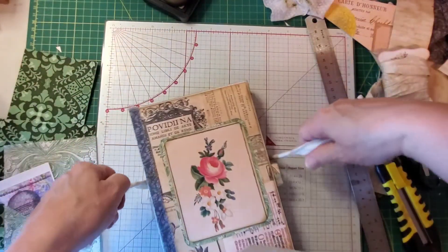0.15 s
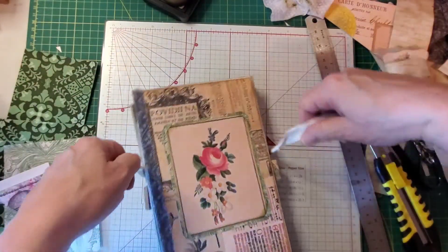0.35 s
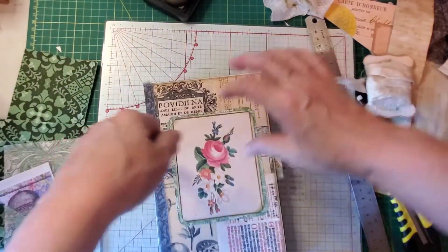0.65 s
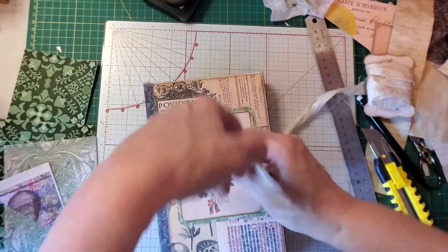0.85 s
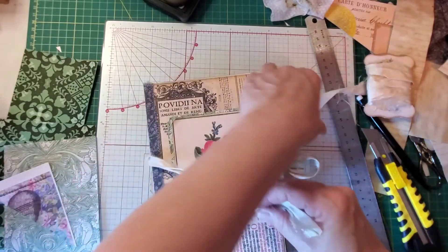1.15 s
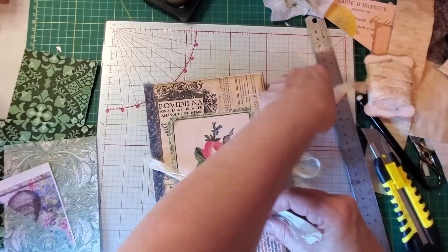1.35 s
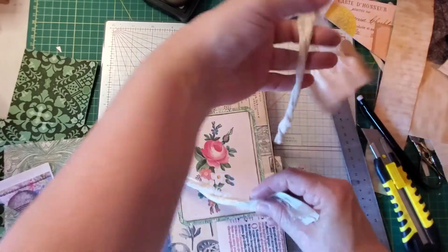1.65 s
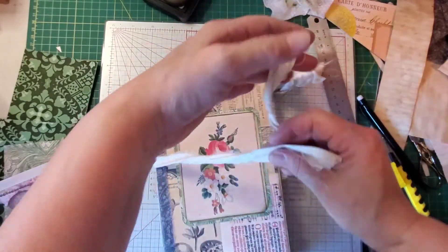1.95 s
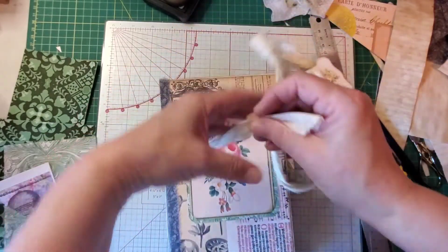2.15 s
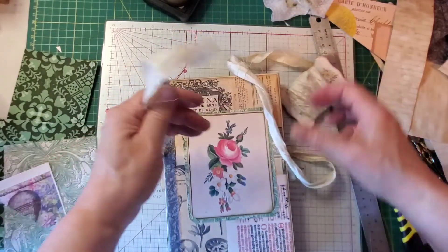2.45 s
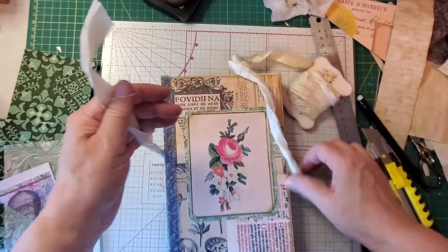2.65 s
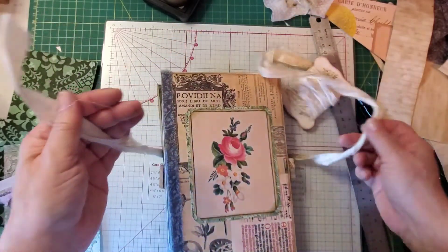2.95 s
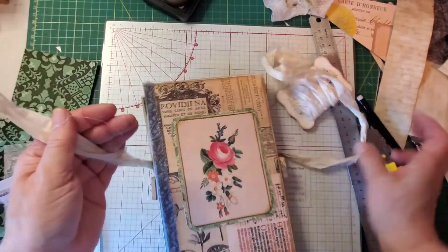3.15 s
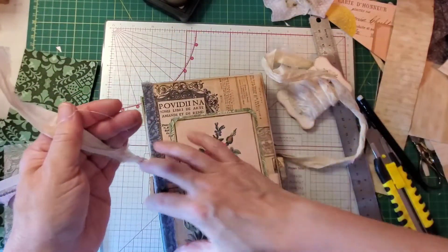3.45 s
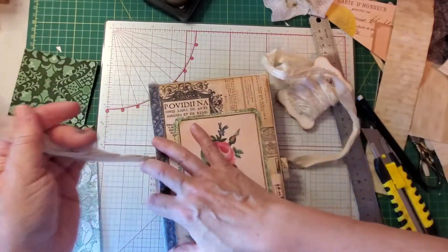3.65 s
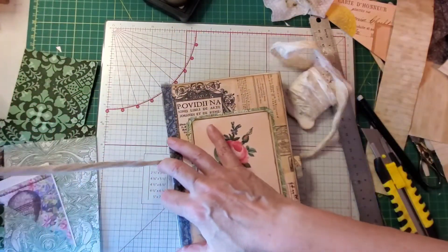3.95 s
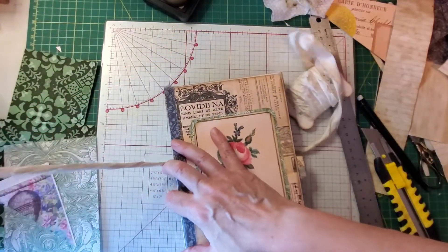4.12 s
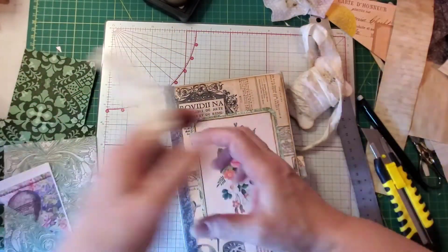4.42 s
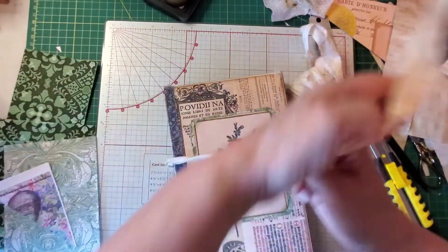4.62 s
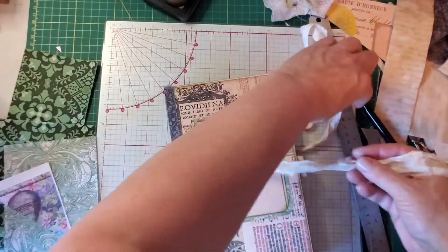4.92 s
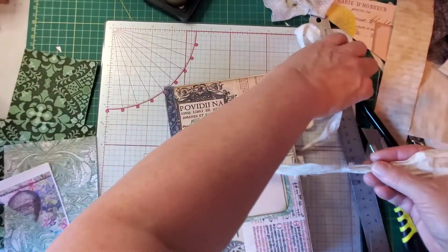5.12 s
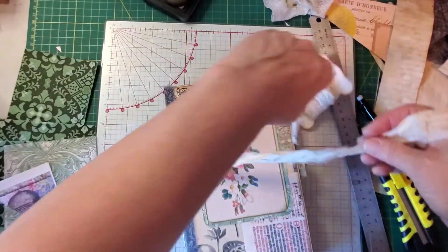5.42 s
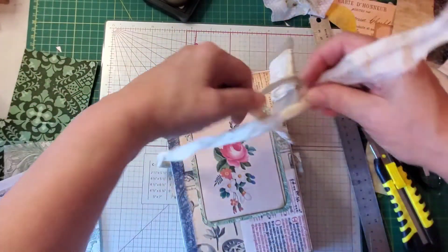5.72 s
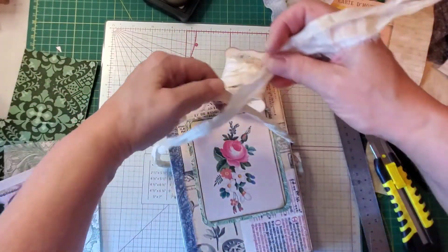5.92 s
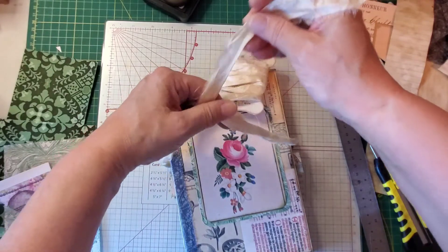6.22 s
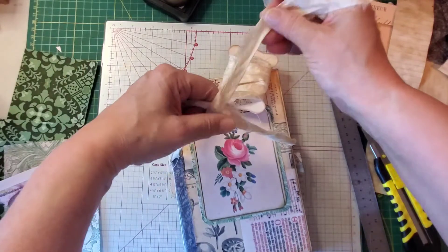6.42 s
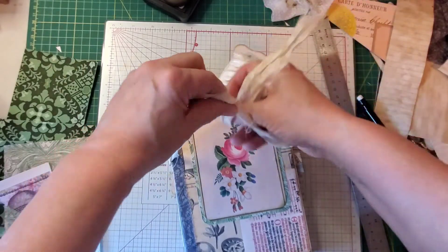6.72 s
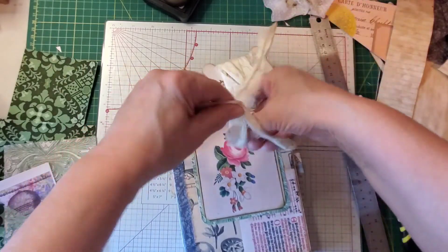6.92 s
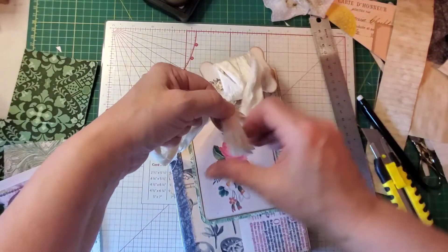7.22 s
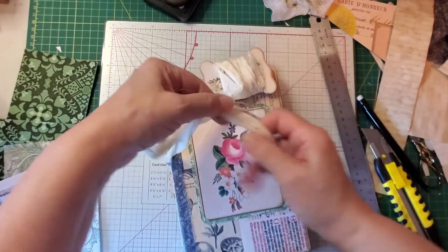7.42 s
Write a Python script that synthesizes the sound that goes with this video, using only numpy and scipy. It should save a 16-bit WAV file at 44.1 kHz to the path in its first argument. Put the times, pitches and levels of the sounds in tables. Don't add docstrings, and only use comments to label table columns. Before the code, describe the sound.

Handling sounds on a craft table, recorded close with a little room echo and a low faint hush. A book slide opens with a dull thump; card catches and drags in bursts, the second far the loudest. A soft ribbon is pulled rasping along the book, the card skids again lying flat, and the ending is nearly silent, with delicate silk rustle and light taps.

```python
import sys
import numpy as np
from scipy import signal
from scipy.fft import rfft, irfft, next_fast_len
from scipy.io import wavfile
from scipy.ndimage import uniform_filter1d, map_coordinates

SR = 44100
rng = np.random.default_rng(int(sys.argv[2]) if len(sys.argv) > 2 else 0)


def transcribe(u):
    v = np.clip(np.atleast_2d(u).T, -1, 1)
    q = np.round(v * 32767).astype(np.int16)
    wavfile.write(sys.argv[1], SR, q)


def undo_db(level):
    steps = np.asarray(level, float) / 20
    return 10 ** steps


N = 333837
T, HZ = np.arange(N) / SR, np.fft.rfftfreq(8192, 1 / SR)
REST_DB = -95
# f/Hz, level/dB
FAR_SIDE = [(25, -9.5), (60, -15.5), (180, -12.5), (550, 1), (1650, 3.5), (4970, 1), (15000, -9)]


def unit_rms(x):
    return x / np.sqrt(np.mean(x ** 2) + 1e-20)


def read(points, hz=HZ):
    f, value = np.transpose(points)
    return np.interp(np.log(hz + 1), np.log(f + 1), value)


def colour(x, gain, size=4096):
    log_gain = np.log(np.maximum(gain, gain.max() * 1e-5))
    circle = signal.hilbert(np.r_[log_gain, log_gain[-2:0:-1]])
    impulse = np.fft.ifft(np.exp(circle.conj())).real[None, :size]
    return signal.oaconvolve(x, impulse, axes=1)[:, :x.shape[1]]


def drift(top_hz):
    t = T[::64]
    speeds_hz = top_hz * np.geomspace(.04, 1, 12)
    slow = sum(np.sin(2 * np.pi * (f * t + rng.random())) / np.sqrt(f) for f in speeds_hz)
    return np.interp(T, t, unit_rms(slow))


def strokes(rows, sag_db_s, stop_s):
    s, rise, glide, db = np.transpose(rows)[:4, :, None]
    t = T[::64]
    start = np.clip(1 + (t - s) / rise, 1e-12, 1)
    end_db = db - sag_db_s * glide
    sag_db = sag_db_s * np.clip(t - s, 0, glide)
    stop_db = abs(end_db - REST_DB) * np.maximum(t - s - glide, 0) / stop_s
    return np.interp(T, t, (db + 20 * np.log10(start) - (sag_db + stop_db)).max(0))


def leaning(level_db, middling_db, slope):
    return middling_db + slope * (np.clip(level_db, REST_DB, 0) + 45)


def along(rows, column):
    rows = np.array(rows)
    return np.interp(T, rows[:, 0] + .004, rows[:, column])


def spikes(rows, db, t60, rise=0.0011):
    train, t = np.zeros(N), T[:8000]
    np.add.at(train, (np.array(rows)[:, 0] * SR).astype(int), undo_db(db))
    return signal.oaconvolve(train, (1 - np.exp(-t / rise)) * undo_db(-60 * t / t60))[:N]


def slips(per_s, spread_db, t60, smooth):
    size = undo_db(spread_db * np.minimum(rng.exponential(1, N), 4))
    releases = size * (rng.random(N) < per_s / SR)
    grain = signal.oaconvolve(releases, undo_db(-60 * T[:2000] / t60))[:N]
    return unit_rms(smooth + unit_rms(grain))


def pair(pressure, side, lag_share=.7):
    size = next_fast_len(len(pressure))
    hz = np.fft.rfftfreq(size, 1 / SR)
    mid, other = pressure * rng.standard_normal((2, len(pressure)))
    share = lag_share * np.tanh(3 * np.cos(np.sqrt(hz / 40)))
    mixed = 1j * share * rfft(mid, size) + np.sqrt(1 - share ** 2) * rfft(other, size)
    other = irfft(mixed * undo_db(read(side, hz)), size)[:len(pressure)]
    return np.array([mid + other, mid - other])


def rub(pressure, bright_db, hollow_db, pan_db, body, rings=(), lean_db=None, low_hz=1400):
    # f/Hz, level/dB
    near_side = [(60, -2), (150, -16.5), (380, -21.5), (950, -5), (2380, -2.5), (5980, -0.5), (15000, 2)]
    resonance = sum(undo_db(2 * db) / (1 + (2 * (HZ - hz) / width) ** 2) for hz, width, db in rings)
    gain = undo_db(read(body)) * np.sqrt(1 + resonance)
    low = 1 / np.sqrt(1 + (HZ / low_hz) ** 12)
    high = 1 / np.sqrt(1 + (7200 / (HZ + 1)) ** 16)
    middle = unit_rms(np.sqrt((1 - low ** 2) * (1 - high ** 2)) * gain)
    parts = [(unit_rms(low * gain), hollow_db), (unit_rms(high * gain), bright_db)]
    if lean_db is None:
        parts.append((middle, 0))
    else:
        under = 1 / np.sqrt(1 + (HZ / 3050) ** 16)
        parts += [(middle * under, lean_db / 2), (middle * np.sqrt(1 - under ** 2), -lean_db / 2)]
    touching = np.flatnonzero(pressure > 1e-9)
    busy, out = slice(touching[0], touching[-1] + 4096), np.zeros((2, N))
    drive = pair(pressure[busy], near_side)
    for part, db in parts:
        out[:, busy] += colour(drive * undo_db(db + np.zeros(N))[busy], part, size=2048)
    return out * undo_db(np.outer([.5, -.5], pan_db))


def flexing(sound, samples, top_hz):
    busy = np.flatnonzero(abs(sound[0]) > 1e-9)
    at, out = busy + (samples * drift(top_hz))[busy], np.zeros((2, N))
    out[:, busy] = [map_coordinates(port, [at], order=3) for port in sound]
    return out


def shifting(x, patchy_db):
    z = signal.stft(x, nperseg=256, noverlap=192)[2]
    patches = rng.standard_normal(z.shape[::-1][:2]).T
    patches = uniform_filter1d(patches, size=3, axis=0)
    patches = uniform_filter1d(patches, size=24, axis=1)
    return signal.istft(z * undo_db(patchy_db * unit_rms(patches)), nperseg=256, noverlap=192)[1][:, :N]


def hush():
    # f/Hz, level/dB per Hz
    noise_db = [(15, -45), (30, -17.0), (45, -5.0), (80, 0.0), (110, -7.0), (200, -14.0), (260, -20.0),
                (330, -19.0), (600, -27.0), (800, -32.0), (1100, -39.0), (2500, -42.0), (6800, -50.0),
                (8200, -47.0), (15500, -48.0)]
    noise = pair(undo_db(1.2 * drift(8)), FAR_SIDE, lag_share=.4)
    return undo_db(-64.5) * unit_rms(colour(noise, undo_db(read(noise_db))))


def table():
    # strongest t/s, rise/s, hold/s, level/dB
    jolts = [(0.02, 0.112, 0.0029, -38.5), (0.1, 0.048, 0.159, -56), (0.47, 0.0685, 0.015, -55.5),
             (0.62, 0.059, 0.0374, -58.5), (1.214, 0.0091, 0.159, -47), (1.584, 0.197, .02, -57.5),
             (1.734, .03, 0.0801, -41.5), (1.86, .03, 0.31, -50.5), (2.182, 0.06, 0.0724, -55),
             (3.036, 0.032, 0.0149, -64), (3.582, 0.077, 0.18, -59.5), (3.9, 0.14, 0.22, -66.5),
             (4.178, 0.14, 0.011, -60.5), (5.046, 0.0174, 0.085, -50), (5.15, 0.041, 0.1076, -43)]
    # f/Hz, level/dB per Hz
    board = [(15, -44.5), (25, -14), (60, -7.5), (81, 5.5), (102, -9.5), (162, 3), (209, -11), (251, -20.5),
             (306, -4), (400, -17), (520, -44), (880, -120)]
    # t/s, peak level/dB, f/Hz, t60/s
    thumps = [
        (0, -33, 56.7, 0.309),
        (0.458, -50.5, 65.7, 0.306),
        (1.263, -49, 61.1, 0.287),
        (3.03, -54.5, 110.1, 0.08),
        (5.151, -54, 72.5, 0.198),
        (5.264, -60, 70, 0.37),
    ]
    gain, t = undo_db(read(board)), T[:20000]
    rumble = pair(undo_db(strokes(jolts, sag_db_s=47.5, stop_s=0.2)), FAR_SIDE)
    out = colour(rumble, gain / np.sqrt(np.mean(gain ** 2)))
    delay_s = np.array([[.0035], [.0045]])
    for s, db, hz, t60 in thumps:
        envelope = undo_db(db + 8.5 - 60 * t / t60) * (1 - np.exp(-t / 0.0078))
        swing = -envelope * np.sin(2 * np.pi * hz * (t - delay_s))
        out[:, int(s * SR):][:, :len(t)] += swing * undo_db([[.8], [-.8]])
    return out


def book_slide():
    # fastest t/s, rise/s, glide/s, rub level/dB
    slides = [
        (0.012, 0.06, 0.012, -40),
        (0.09, .03, .16, -57.5),
        (0.456, 0.0062, 0.098, -60.5),
    ]
    # t/s, peak level/dB
    judders = [
        (0.008, -42.5),
        (0.0165, -45),
        (0.025, -45),
        (0.035, -45),
        (0.048, -48.5),
        (0.06, -53),
        (0.103, -57.5),
    ]
    # f/Hz, level/dB per Hz
    mat = [(150, -32), (250, 2), (325, -16), (476, 0), (816, 1.5), (1260, -14), (1760, -7), (2240, -12.5),
           (3340, -6.5), (5350, -19.5), (16000, -28.5)]
    # f/Hz, width/Hz, level/dB
    card_rings = [(1740, 120, 5.5), (2526, 120, 4.5), (3507, 80, 0.5), (3780, 200, 2.5), (6050, 120, 8.5),
                  (8180, 53, 9)]
    db = strokes(slides, sag_db_s=150, stop_s=0.13)
    grain = slips(430, spread_db=4.0, t60=0.0223, smooth=0.89)
    bumps = spikes(judders, np.array(judders)[:, 1], t60=0.076, rise=.0016)
    bright_db = leaning(db, middling_db=-7, slope=-0.2)
    hollow_db = leaning(db, middling_db=-9, slope=-0.2)
    return rub(undo_db(db) * grain + bumps, bright_db, hollow_db, 5.5, mat, card_rings)


def silk():
    # fastest t/s, rise/s, glide/s, rub level/dB
    fingers = [(0.352, 0.25, .08, -75.5), (0.47, 0.146, 0.171, -70), (0.7, 0.07, 0.087, -77),
               (0.9, 0.108, 0.4, -86.5), (1.42, 0.056, .04, -80.5), (1.515, 0.073, 0.0244, -53.5),
               (1.605, 0.0026, 0.0037, -56), (2.34, 0.19, 0.02, -84.5), (2.512, .05, 0.015, -88.5),
               (2.642, 0.05, 0.19, -90), (2.95, 0.1475, 0.068, -81), (3.34, 0.051, 0.13, -84),
               (4.22, 0.026, 0.099, -83), (4.59, 0.076, 0.047, -80.5), (4.83, 0.15, 0.012, -75.5),
               (5.0, 0.042, .03, -79), (5.4, 0.092, 0.21, -75), (5.66, 0.648, 0.1132, -70),
               (5.93, 0.037, 0.0285, -79), (6.345, 0.13, 0.0051, -75.5), (6.535, 0.11, 0.0223, -72),
               (6.79, 0.242, 0.0897, -75), (7.0, 0.13, 0.0454, -79.5), (7.44, 0.14, .03, -80.5),
               (7.5, 0.093, .1, -64.5)]
    # f/Hz, level/dB per Hz
    weave = [(900, -30), (1500, -17), (2050, -12), (2550, -5), (3300, -5), (4200, -6), (7200, -12),
             (8000, -6), (10800, -4), (16000, -9)]
    db = strokes(fingers, sag_db_s=8.5, stop_s=.11)
    db = np.maximum(db, -96.5 + 1.6 * drift(3))
    grain = slips(250, spread_db=1.0, t60=0.027, smooth=2.1)
    bright_db = leaning(db, middling_db=-2.5, slope=-0.26)
    return rub(undo_db(db) * grain, bright_db, hollow_db=-24, pan_db=5, body=weave)


def snaps():
    # t/s, peak level/dB, brightness/dB, left-right/dB
    snap_events = [(0.1391, -52, -3, 5), (0.182, -58, 8.5, 5), (0.2227, -60.5, 6.5, 12),
                   (0.375, -68.5, 13.5, 1), (0.4546, -55, -25.5, 5), (0.599, -61.5, -21.5, 9),
                   (1.5741, -52.5, -10.5, 1), (1.6066, -40.5, -21, 5), (2.5044, -65.5, 5.5, 4.5),
                   (2.5347, -79.5, 8, 1.5), (2.6292, -74, 12.5, -0.5), (2.637, -76, 9.5, 4),
                   (2.678, -71.5, 8.5, 1.5), (2.685, -73, 8.5, 6.5), (2.692, -75.5, 12, 3),
                   (2.7235, -78.5, 11.5, 5.5), (2.742, -77.5, 12.5, 1), (2.783, -64.5, 9, 2.5),
                   (2.831, -72.5, 11, 3.5), (2.8435, -76.5, 9, 5.5), (2.8827, -69, 11, 4),
                   (2.897, -74, 9.5, 3), (2.9332, -71.5, 23, -1), (2.9592, -70, 1.5, 10.5),
                   (3.0211, -75.5, 14.5, 3), (3.04, -75.5, 13.5, 6.5), (3.3405, -75.5, 13, 2),
                   (3.354, -69.5, 17, 2.5), (3.375, -68, 10.5, 4.5), (3.394, -61.5, 13, 3),
                   (3.4198, -59, 8, 5), (3.4425, -61.5, 9.5, 4.5), (3.476, -64, 8.5, 17.5),
                   (6.5374, -74, -2.5, 10)]
    # f/Hz, level/dB per Hz
    crease = [(400, -28), (900, -5), (2500, -1.5), (5000, -5), (7200, -12.5), (8500, -3), (15800, -3)]
    s, db, bright_db, pan_db = np.transpose(snap_events)
    latest = np.clip(np.searchsorted(s, T + .005) - 1, 0, len(s) - 1)
    tick = spikes(snap_events, db - 0.5, t60=0.028, rise=0.000081)
    crumble = spikes(snap_events, db - 20, t60=0.12)
    return rub(tick + crumble, bright_db[latest], -2.5, pan_db[latest], crease)


def taps():
    # t/s, peak level/dB, f/Hz, t60/s
    tap_events = [(0.454, -62, 339, 0.06), (0.612, -52, 312, 0.06), (1.221, -40.5, 327, 0.074),
                  (1.509, -50, 3900, .03), (1.536, -49, 3900, .025), (1.573, -50, 2600, .02),
                  (1.6065, -38, 3400, .016), (1.534, -51.5, 298, 0.07), (1.571, -45.5, 410, 0.041),
                  (1.607, -40.5, 486, 0.022), (2.529, -73, 686, 0.047), (2.689, -60, 688, 0.032),
                  (3.03, -49, 378, 0.025), (6.342, -67, 2450, .03), (6.345, -72, 1000, .03),
                  (6.535, -70, 600, 0.03), (6.621, -69, 640, 0.03), (6.924, -68, 400, 0.03),
                  (6.969, -66, 620, 0.016), (7.036, -63, 700, 0.03), (7.052, -64, 660, .02),
                  (7.372, -69, 502, 0.016)]
    out, t, push_t = np.zeros((2, N + 9000)), T[:6000], T[:700]
    push_shape = undo_db(-60 * push_t / .026) * (1 - np.exp(-push_t / .001))
    pushes = rng.standard_normal((len(tap_events), 2, 700)) * push_shape
    modes = (1, 1), (1.3, .6), (.66, .6), (1.9, .12)
    for (s, db, hz, t60), push in zip(tap_events, pushes):
        ring = sum(share * np.sin(2 * np.pi * k * hz * t) for k, share in modes)
        ring = ring * (1 - np.exp(-t * hz / .4)) * undo_db(-60 * t / np.clip(t60, .015, .045))
        both = push[0] + .3 * push * [[0], [1]]
        knock = signal.oaconvolve(both, ring[None], axes=1)
        out[:, int(s * SR):][:, :knock.shape[1]] += undo_db(db + 8.0) * knock / abs(knock).max()
    return out[:, :N]


def bobbin():
    # fastest t/s, rise/s, glide/s, scrape level/dB, brightness/dB
    skids = [
        (1.246, 0.04244, 0.16, -51, 3.5),
        (1.74, 0.0297, .05, -30.5, 2.5),
        (1.8, 0.04657, .19, -31, 2),
        (2.012, 0.088, 0.1392, -49, 1),
        (2.204, 0.0703, 0.013, -52.5, 1.5),
        (5.037, .003, 0.16, -36, 4),
        (5.141, .004, .03, -43, -1),
        (5.183, 0.0047, 0.083, -41, -0.5),
    ]
    # t/s, peak level/dB, lean to lower rings/dB, hollowness/dB
    catches = [(1.2113, -54.5, 11.5, 10), (1.2205, -39, -1, -0.5), (1.2444, -38, -1, -2.5),
               (1.2535, -41.5, 3, -6), (1.265, -36, 5.5, -11.5), (1.279, -44.5, 4.5, -7),
               (1.2971, -36, 0.5, -4.5), (1.3184, -45, 10.5, -1.5), (1.3534, -38, -1.5, -9),
               (1.366, -45.5, 5, -14), (1.3835, -61, 4.5, 7.5), (1.7195, -19.5, -1.5, -6.5),
               (1.7325, -14.5, 1, -16.5), (1.746, -18, -4.5, -15.5), (1.7575, -18.5, 0, -13.5),
               (1.7653, -31, -3.5, -13.5), (1.7915, -20.5, -0.5, -7), (1.8024, -22.5, -3.5, -3),
               (1.811, -26, -4.5, -1), (1.823, -35.5, 0.5, -21.5), (1.8341, -34.5, -2.5, -12.5),
               (1.879, -30, -4.5, -7), (1.8879, -28, 0.5, -10.5), (1.9121, -45, 0.5, -11),
               (1.9767, -43, 2, -5.5), (2.0005, -41, 6, -10), (2.0135, -45, 2, -6), (2.0256, -43, 10, -5.5),
               (2.0654, -37.5, 4.5, -8), (2.0893, -39.5, 9.5, -10), (2.1775, -44, 3.5, -7.5),
               (2.197, -40, 7.5, -13), (2.2083, -41, 6, -9), (2.2295, -43, 9, -7),
               (2.2442, -47.5, 6.5, -12.5), (5.0342, -31, -6, -9.5), (5.0428, -29, -4, -16),
               (5.0567, -25.5, -4, -9.5), (5.072, -21.5, -4, -15.5), (5.081, -32, 0.5, -10.5),
               (5.098, -35.5, -6, -11), (5.1378, -27, 2, -6.5), (5.1504, -35.5, 2.5, -6.5),
               (5.1808, -29.5, -0.5, -8), (5.1964, -31, 2.5, -7), (5.2135, -39.5, 2, -6.5),
               (5.2386, -32, 1, -13.5), (5.2483, -36, 0.5, -14), (5.2639, -47.5, 1.5, -2.5)]
    # f/Hz, level/dB per Hz
    on_edge = [(150, -45), (250, -18.5), (720, -16), (1010, -15.5), (1280, -21.5), (1750, -10.5),
               (2570, -7), (3150, -13.5), (3700, -2.5), (4400, -15.5), (6200, -15.5), (7200, -27),
               (8500, -19.5), (16000, -28.5)]
    # f/Hz, width/Hz, level over scrape/dB
    edge_rings = [(747, 86, 3.5), (1020.8, 20, 16.5), (1747, 36, 4.5), (1995, 65, -0.5), (2584, 90, 7),
                  (2860, 9.8, 9), (3630, 330, 2), (3850, 110, -0.5), (3280, 50, 2), (2144, 90, 1.5),
                  (6100, 220, 0)]
    # f/Hz, level/dB per Hz
    flat = [(150, -38.5), (250, -15.5), (735, -2.5), (906, -9), (988, -8.5), (1260, -20.5), (1380, -14.5),
            (3710, -12), (5070, -23), (9170, -21.5), (16000, -27.5)]
    # f/Hz, width/Hz, level/dB
    flat_rings = [(1006.1, 32, 8.5), (2824.6, 31, 7.5), (3650, 170, 6), (6095, 86, 8.5), (7812, 68, 6),
                  (1887, 66, 6), (2560, 79, 6.5), (9370, 90, 8.5), (10500, 70, 11.5)]
    flat_from_s = 4
    db = strokes(skids, sag_db_s=140, stop_s=.13)
    bright_db = leaning(db, middling_db=-9.5, slope=0.28) + along(skids, column=4)
    lean_db, hollow_db = along(catches, column=2), along(catches, column=3)
    knocks = spikes(catches, np.array(catches)[:, 1] - 3.5, t60=0.038, rise=.0015)
    pressure = undo_db(db) * slips(860, spread_db=2.5, t60=0.013, smooth=1.6) + knocks
    before, after = pressure * (T < flat_from_s), pressure * (T >= flat_from_s)
    sound = rub(before, bright_db, hollow_db, 3, on_edge, edge_rings, lean_db)
    sound += rub(after, bright_db, hollow_db, 2.5, flat, flat_rings, lean_db)
    return flexing(sound, samples=22, top_hz=7.6)


def pulled_tie():
    # t/s, rub level/dB, tautness as brightness/dB
    pull = [
        (3.47, -72, 14.5),
        (3.518, -47, 2),
        (3.554, -54, 0.5),
        (3.642, -47.5, 2),
        (3.714, -48.5, -2.5),
        (3.852, -49, 1),
        (3.996, -55.5, 2.5),
        (4.174, -54, 5.5),
        (4.21, -77.5, 8),
    ]
    # t/s, peak level/dB, hollowness/dB
    slubs = [(3.506, -46.5, -4), (3.518, -36.5, -13.5), (3.5391, -47.5, -9.5), (3.5532, -50.5, -3),
             (3.5671, -38, -3.5), (3.5817, -46.5, -4.5), (3.598, -48, 0), (3.624, -34.5, -11),
             (3.6426, -39, -12), (3.66, -50, -2.5), (3.7136, -52.5, 2), (3.7471, -41, -2.5),
             (3.7733, -40.5, -6), (3.815, -39.5, -3), (3.8532, -46.5, -2.5), (3.8838, -52, -6.5),
             (3.9227, -51.5, 2.5), (3.983, -51.5, -6.5), (4.052, -54.5, 3), (4.0998, -39.5, -1.5),
             (4.119, -49, 2.5), (4.1479, -54, -4)]
    # f/Hz, level/dB per Hz
    book = [(120, -48.5), (200, -4.5), (259, -16), (311, -1.5), (548, -1.5), (709, -1.5), (950, -11),
            (1080, -22.5), (1270, -19.5), (2290, -26), (3370, -23), (6760, -28), (9230, -18), (16000, -19)]
    # f/Hz, width/Hz, level/dB
    book_rings = [(672, 75, -1.5), (1303, 162, 4.5), (1601, 63, 3), (3430, 152, 3)]
    s, rub_db, taut_db = np.transpose(pull)
    level = undo_db(np.interp(T, s, rub_db, left=-300, right=-300))
    bright_db = np.interp(T, s, taut_db) - 0.5
    grain = slips(400, spread_db=3, t60=.012, smooth=1.8)
    snags = spikes(slubs, np.array(slubs)[:, 1] - 7, t60=0.0539, rise=0.00576) * (level > 1e-9)
    pressure = undo_db(-1.5) * level * grain + snags
    hollow_db = -6.5 + along(slubs, column=2)
    sound = rub(pressure, bright_db, hollow_db, 2.5, book, book_rings, low_hz=1062)
    return flexing(sound, samples=36, top_hz=6.5)


def room(x):
    # f/Hz, t60/s
    decay = [(100, .22), (1000, .14), (5000, .13), (14000, .1)]
    size = SR // 4
    echoes, slots = np.zeros((2, size)), np.arange(120, size - 20, 20)
    at = slots + rng.integers(0, 20, (2, len(slots)))
    np.put_along_axis(echoes, at, rng.choice([-1., 1.], at.shape), 1)
    hz, t, z = signal.stft(echoes, SR, nperseg=256)
    alike = 1 / (1 + (hz[:, None] / 1200) ** 2)
    z = np.array([z[0], alike * z[0] + np.sqrt(1 - alike ** 2) * z[1]])
    tail = signal.istft(z * undo_db(-60 * t / read(decay, hz)[:, None]), SR, nperseg=256)[1]
    return signal.oaconvolve(x, tail / np.linalg.norm(tail[0]), axes=1)[:, :N]


def scene():
    rubbing = shifting(book_slide() + bobbin() + pulled_tie(), patchy_db=2.5)
    near = rubbing + silk() + snaps() + taps()
    return undo_db(-1.5) * near + undo_db(-7.0) * room(near) + table() + hush()


def low_pass(x):
    return signal.sosfilt(signal.butter(12, 16520, fs=SR, output="sos"), x)


def record(dry):
    lowpass = signal.firwin(255, 15900, window=("kaiser", 9), fs=SR)
    limited = signal.oaconvolve(dry, lowpass[None], "same")
    return low_pass(limited)


dry = scene()
out = record(dry)
transcribe(out)
```